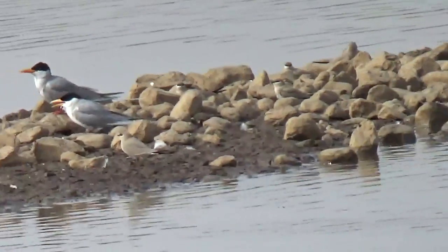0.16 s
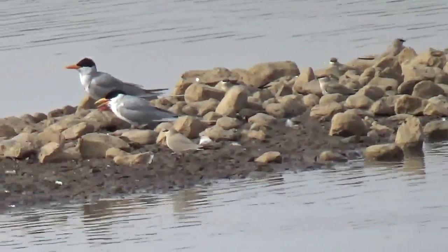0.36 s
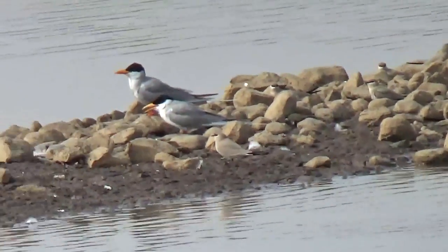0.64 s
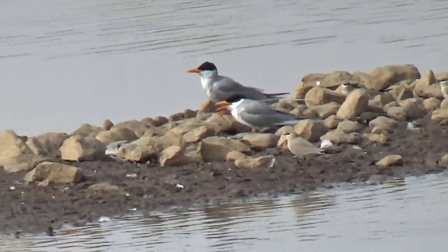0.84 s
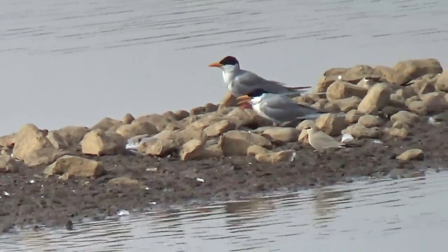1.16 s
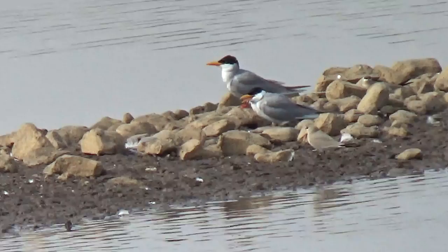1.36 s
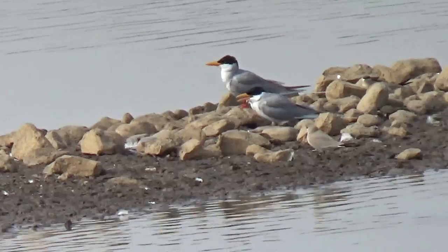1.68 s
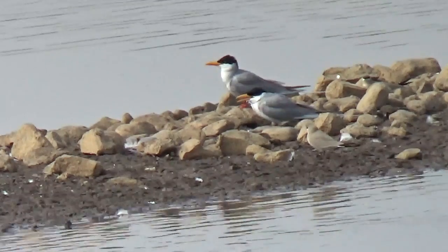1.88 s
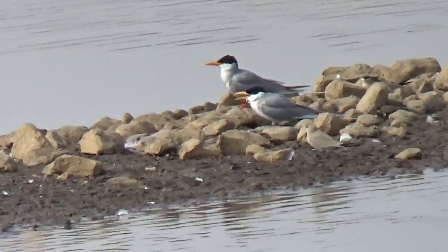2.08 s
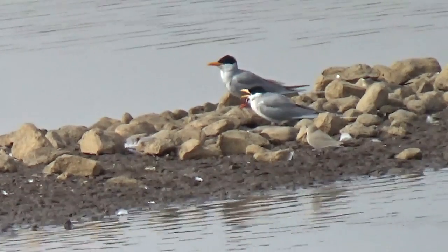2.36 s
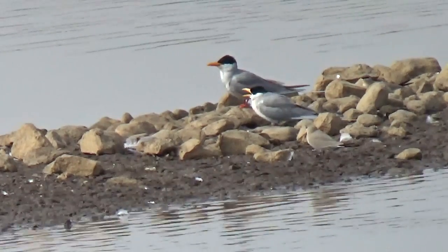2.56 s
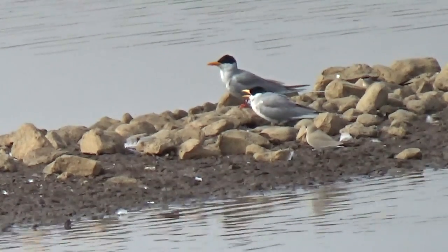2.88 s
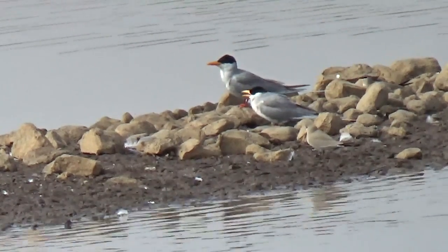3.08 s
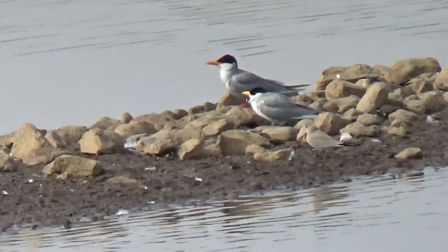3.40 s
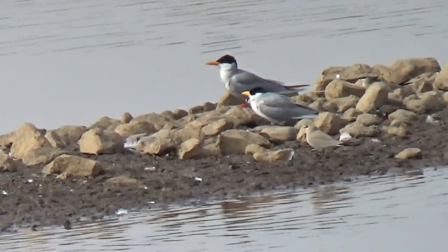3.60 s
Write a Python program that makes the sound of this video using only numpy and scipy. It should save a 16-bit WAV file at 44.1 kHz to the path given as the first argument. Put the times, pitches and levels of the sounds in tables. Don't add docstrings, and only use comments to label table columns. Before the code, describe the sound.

Tern calls run throughout: clipped, squeaky notes with rising lead-ins, strongest and brightest around 1.2-2.3 s, softer afterwards. A far wader pipes thinly until 1.1 s and faintly at 1.6. Soft wind hiss and low camera hum continue. A small plastic crack comes at 0.1 s; rubbing and sliding grow from 1.2, a loud crack and creaks hit at 2.1, then knocks near 2.5 and 2.9.

```python
import sys
import numpy as np
from scipy import signal
from scipy.fft import rfft, irfft
from scipy.io import wavfile
from scipy.ndimage import uniform_filter1d

SR = 44100
rng = np.random.default_rng(int(sys.argv[2]) if len(sys.argv) > 2 else 0)


def convert_level_to_amplitude(level_db):
    exponent = np.asarray(level_db, float) / 20
    return 10 ** exponent


def output_pcm(signal):
    pcm = np.clip(np.atleast_2d(signal).T, -1, 1) * 32767
    wavfile.write(sys.argv[1], SR, np.round(pcm).astype(np.int16))


N = 164934

# (start [s], length [s], top pitch [Hz], level [dB], beak opening [-0.5 to 1, below 0
TERN_NOTES = [(.225, 0.04, 1273, -53.5, 0), (.463, 0.044, 1277, -54, 0.45), (.597, 0.045, 1280, -53.5, 0.4),
              (.843, 0.041, 1303, -55, 0.2), (.918, 0.034, 1260, -54, 0.4), (1.179, 0.048, 1312, -51, 0.97),
              (1.437, 0.051, 1317, -48.5, 0.94), (1.828, 0.055, 1250, -49.5, 0.94),
              (1.913, 0.041, 1273, -49.5, 0.9), (2.206, .043, 1312, -51.5, 1),
              (2.287, 0.041, 1310, -56, 0.88), (2.532, 0.045, 1355, -55.5, 0.5),
              (2.612, 0.027, 1240, -61.5, -.45), (2.68, 0.036, 1302, -55, 0),
              (2.931, 0.045, 1356, -55.5, 0.2), (3.204, 0.043, 1317, -57, 0.1)]
# (start [s], length [s],
# end pitch [Hz], level [dB], beak opening [0-1])
TERN_LEADS = [(.188, 0.043, 1211, -52.5, 0.46), (.436, 0.031, 1216, -53.5, 0.34),
              (.815, 0.03, 1255, -57, 0.36), (1.151, 0.031, 1268, -51.5, 0.8),
              (1.412, 0.026, 1262, -49.5, 0.76), (1.8, 0.031, 1208, -51, 0.83), (1.89, 0.027, 1210, -54, 1),
              (2.178, 0.0278, 1294, -54, 0.95), (2.503, 0.028, 1280, -58.5, 0.3),
              (2.897, 0.025, 1260, -58, 0), (3.172, 0.039, 1285, -60, 0.2), (.951, 0.01, 1210, -52, 0)]
# (frequency [Hz], level with beak shut [dB], level with beak open [dB])
THROAT = [(1250, -11, -10), (2250, -7, -9), (2550, 0, 0), (3450, 2, -9), (3850, -9, -22), (4600, -23, -2),
          (5200, -16, 0), (6200, -17, -22)]
# (start [s], length [s], pitch [Hz], level [dB])
PIPES = [
    (0.088, 0.04, 3060, -63),
    (0.247, 0.04, 3080, -60),
    (.36, .045, 2830, -68),
    (0.418, .036, 3040, -62.5),
    (0.592, .031, 3010, -61),
    (0.756, 0.033, 3060, -60),
    (.92, .03, 3020, -67),
    (1.097, 0.03, 2980, -63),
    (1.618, .032, 2940, -66),
]
# (multiple of the shaft turn [1], level [dB], wander [dB])
MOTOR_ORDERS = [(10, -67.5, 2.4), (11, -47.5, 1.5), (12, -68, 8.8), (13, -67, 3.7), (22, -76, 3.2)]
# (time [s], level [dB])
MOTOR_LOAD = [(.15, -4.5), (.5, -1), (.75, -4), (1.9, -0.5), (2.36, 0.5), (2.56, -8), (2.75, 0),
              (3.5, -1.5), (3.74, -6)]
# (frequency [Hz], density [dB per Hz])
WIND_COLOUR = [(25, -15), (110, -2.5), (185, 8), (300, 3), (820, -11), (1900, -7.5), (5000, -20),
               (11000, -34.5)]
# (frequency [Hz], density [dB per Hz])
RUB_COLOUR = [(250, -7), (800, 7.5), (2000, 2), (4500, 0), (8000, -4), (11000, -13)]
# (time [s], level [dB])
RUB_PRESSURE = [(0, -63.5), (.65, -61.5), (1.1, -64.5), (1.2, -58.5), (1.3, -59), (1.7, -60.5), (1.82, -57),
                (2.0, -57.5), (2.12, -58.5), (2.5, -59), (2.65, -61), (3.0, -65), (3.74, -66)]
# (frequency [Hz], density [dB per Hz])
CLOTH_COLOUR = [(7200, -15), (8300, -13), (9200, -5), (11000, -4.5)]
# (time [s], level [dB])
CLOTH_SPEED = [(0, -60.5), (0.802, -61.5), (1.17, -64.5), (1.24, -52), (1.5, -49), (1.62, -54), (1.82, -53),
               (2.03, -59), (2.11, -49), (2.2, -59.5), (2.4, -58), (2.65, -62.5), (3.0, -65.5)]
# (start [s], peak [dB], rise [s])
SNAPS = [
    (0.0862, -25.5, 0.00042),
    (2.0866, -11.5, 0.00095),
]
# (frequency [Hz], level [dB], t60 [s])
SNAP_MODES = [
    [(3700, 0, 0.01), (4290, -14, 0.02), (2700, 0.5, 0.004), (4960, -4.5, 0.0031), (7770, -5.5, 0.0022),
     (10500, -7, 0.0029)],
    [(3930, 2.5, 0.0049), (3190, 8.5, 0.0025), (1700, -23, 0.0079), (10700, -20, .004), (5330, -17, 0.0048),
     (6740, -16, 0.011), (7800, -17, 0.0068), (8950, -19.5, 0.01)],
]
# (start [s], peak [dB], frequency [Hz])
TICKS = [(0.212, -46, 9700), (0.2253, -37, 11100), (0.2921, -47, 10600), (0.438, -46.5, 10100),
         (0.57, -48, 10700), (0.6155, -47, 10700), (0.7406, -47.5, 10500), (0.754, -49, 10800),
         (0.7977, -53, 10000), (1.5244, -44.5, 9700), (1.7388, -46, 10700), (1.7918, -40, 10300),
         (1.8028, -41, 9500), (1.8165, -36.5, 10500), (1.94, -44, 10100), (.4569, -51, 9250),
         (.605, -52, 9200), (2.5566, -51, 10400), (2.3588, -40.5, 10300)]
# (start [s], peak [dB], frequency [Hz])
CLICKS = [(0.1317, -61.5, 3000), (.154, -61, 4500), (0.5585, -56, 2700), (1.6165, -58.5, 2920),
          (1.6526, -55.5, 4130), (1.8147, -50.5, 4130), (2.0812, -53.5, 3320), (2.098, -54, 3200),
          (2.3588, -53.5, 3960), (1.143, -59, 3600), (.2927, -61, 5500), (.796, -63, 3170),
          (2.471, -53, 2840), (2.535, -54.5, 3360), (2.9216, -53, 2970)]
# (start [s], peak [dB], frequency [Hz])
KNOCKS = [
    (0.558, -48, 820),
    (1.815, -45, 653),
    (2.469, -40.5, 764),
    (2.535, -41.5, 1310),
    (2.921, -46, 1110),
]
# (start [s], peak [dB], frequency [Hz])
PINGS = [(.1635, -44, 4170), (.182, -49.5, 990), (.264, -55, 4200), (2.1005, -46, 1450), (2.103, -39, 3520),
         (2.1055, -46, 9450), (2.1088, -33, 9700), (2.1092, -38, 2800), (2.1125, -39, 1990),
         (2.1172, -35.5, 1840), (2.1187, -39, 2830), (2.1237, -44, 1800), (2.395, -56, 530),
         (2.425, -54, 627), (2.449, -48, 860), (2.538, -55, 1210), (2.5566, -52, 6400), (2.558, -45, 4900),
         (2.712, -50, 1200), (3.126, -50, 2350), (3.2205, -48, 587), (3.227, -55, 463)]
# (start [s], length [s], level [dB], first pitch [Hz], last pitch [Hz])
SCUFFLES = [
    (2.069, 0.041, -51, 1230, 990),
    (2.404, 0.057, -61, 800, 715),
    (2.798, 0.018, -52.5, 2980, 2550),
]


def walk(rate):
    hold = int(SR / rate)
    steps = np.repeat(rng.standard_normal(N // hold + 1), hold)
    return 1.24 * uniform_filter1d(uniform_filter1d(steps, hold), hold)[:N]


def curve(points):
    s, db = np.array(points).T
    return np.interp(np.arange(N) / SR, s, db)


def colour(x, points):
    hz, db = np.array(points).T
    gain = convert_level_to_amplitude(np.interp(np.log(np.fft.rfftfreq(N, 1 / SR) + 1), np.log(hz), db))
    y = irfft(rfft(x) * gain, N)
    return y / y.std()


def add(out, start, x):
    i = int(start * SR)
    out[i:i + len(x)] += x[:N - i]


def swell(t, length, attack, release):
    ramp = np.minimum(t / attack, (length - t) / release)
    return np.sin(np.pi / 2 * np.clip(ramp, 0, 1)) ** 2


def ring(hz, db, t60, rise=0.00006):
    t = np.arange(int(.06 * SR)) / SR
    return convert_level_to_amplitude(db - 60 * t / t60) * np.sin(2 * np.pi * hz * t) * np.minimum(t / rise, 1) ** 2


def taps(rows, cycles, spread, gain_db):
    out = np.zeros(N)
    for start, db, hz in rows:
        steps = np.arange(5) - 2 + 0.5 * (rng.random(5) - .5)
        for k, step in enumerate(steps):
            mode = ring(hz * (1 + spread) ** step, db + gain_db - 2.7 * abs(step), cycles / hz)
            add(out, start, mode * (-1) ** k)
    return out


def motor():
    shaft_hz = 16.585
    t = np.arange(N) / SR
    hum = np.zeros(N)
    for order, db, wander_db in MOTOR_ORDERS:
        level = convert_level_to_amplitude(db + wander_db * walk(8))
        drift = 0.22 * wander_db * walk(5.25)
        hum += level * np.sin(2 * np.pi * round(order) * shaft_hz * t + drift)
    return hum * convert_level_to_amplitude(curve(MOTOR_LOAD))


def wind():
    return colour(rng.standard_normal(N), WIND_COLOUR) * convert_level_to_amplitude(-62 + 0.53 * walk(5.0))


def friction(spectrum, effort):
    grains_per_s, scatter_db, grain_share, flicker_db = 1200, 2.8, .5, 1.4
    hits = rng.random(N) < grains_per_s / SR
    sizes = convert_level_to_amplitude(scatter_db * np.minimum(rng.exponential(size=N), 4))
    grains = hits * sizes * rng.standard_normal(N)
    rough = grain_share * grains / grains.std() + rng.standard_normal(N)
    return colour(rough, spectrum) * convert_level_to_amplitude(curve(effort) + flicker_db * walk(25.49))


def hiss(cloth_db):
    fingers = friction(RUB_COLOUR, RUB_PRESSURE)
    cloth = friction(CLOTH_COLOUR, CLOTH_SPEED)
    return wind() + fingers + convert_level_to_amplitude(cloth_db) * cloth


def snaps():
    out = np.zeros(N)
    for (start, db, rise), modes in zip(SNAPS, SNAP_MODES):
        for hz, mode_db, t60 in modes:
            add(out, start, ring(hz, db + mode_db, t60, rise))
    return out


def wader():
    sag, waver_share, flutter_db = .012, .008, 2.5
    out, waver, flutter = np.zeros(N), walk(200), walk(150)
    for start, length, hz, db in PIPES:
        t = np.arange(int(length * SR)) / SR
        span = slice(int(start * SR), int(start * SR) + len(t))
        pitch = hz * (1 + sag * (.5 - t / length) + waver_share * waver[span])
        level = convert_level_to_amplitude(db + flutter_db * flutter[span]) * swell(t, length, .005, .008)
        add(out, start, level * np.sin(2 * np.pi * np.cumsum(pitch) / SR))
    return out


def hand():
    clicks = taps(CLICKS, cycles=20, spread=.3, gain_db=12.0)
    pings = taps(PINGS, cycles=22, spread=.055, gain_db=7.5)
    ticks = taps(TICKS, cycles=45, spread=.06, gain_db=5.0)
    knocks = taps(KNOCKS, cycles=21.6, spread=0.293, gain_db=-2.5)
    return clicks + pings + ticks + knocks


def lead_pitch(t, length, end_hz):
    rise_hz_per_s = 3000
    return end_hz - rise_hz_per_s * (length - t)


def note_pitch(u, top_hz):
    top_at, rise, sag, sag_power = 0.33, 0.04, 0.165, 2.4
    climb = rise * np.clip(1 - u / top_at, 0, 1) ** 2
    fall = sag * (np.clip(u - top_at, 0, 2) / (1 - top_at)) ** sag_power
    return top_hz * (1 - climb - fall)


def beak_closing(u, beak):
    close_at, share = .6, 1.6
    return share * max(beak * (1.15 - beak), 0) * np.clip((u - close_at) / (1 - close_at), 0, 1)


def terns():
    edge_s, waver_share, flutter_db = .005, .005, 1.4
    out, waver = np.zeros(N), walk(300)
    flutter = np.array([walk(160) for _ in range(6)])
    throat_hz, shut_db, open_db = np.array(THROAT).T
    k = np.arange(1, 7)[:, None]
    for rows, is_lead in ((TERN_NOTES, False), (TERN_LEADS, True)):
        for start, length, hz, db, beak in rows:
            t = np.arange(int((length + (-.002 if is_lead else .002)) * SR)) / SR
            u = t / length
            span = slice(int(start * SR), int(start * SR) + len(t))
            pitch = lead_pitch(t, length, hz) if is_lead else note_pitch(u, hz)
            pitch = pitch * (1 + waver_share * waver[span])
            opening = np.clip(beak, -.5, 1) - (0 if is_lead else beak_closing(u, beak))
            throat_db = np.interp(k * pitch, throat_hz, shut_db)
            throat_db = throat_db + opening * np.interp(k * pitch, throat_hz, open_db - shut_db)
            gain = convert_level_to_amplitude(throat_db + flutter_db * np.sqrt(k) * flutter[:, span])
            phase = 2 * np.pi * np.cumsum(pitch) / SR
            voice = (gain * np.sin(k * (phase + k))).sum(axis=0)
            add(out, start - edge_s / 2, voice * swell(t, t[-1], edge_s, edge_s) * convert_level_to_amplitude(db))
    return out


def scuffles():
    taps_per_s = 700
    rows = []
    for start, length, db, first_hz, last_hz in SCUFFLES:
        for u, size, tone in rng.random((int(length * taps_per_s), 3)):
            hz = first_hz + u * (last_hz - first_hz)
            rows.append((start + u * length, db + 5 * (2 * size - 1), hz * 1.38 ** (2 * tone - 1)))
    return taps(rows, cycles=8.7, spread=0.22, gain_db=5.5)


def scene():
    side_db, cloth_side_db, treble_left_db, middle_right_db = -10.5, -3, 1.4, 1.0
    mid = motor() + hiss(0) + snaps() + wader() + hand() + terns() + scuffles()
    apart = signal.lfilter(*signal.butter(1, 600, "high", fs=SR), hiss(cloth_side_db))
    treble = signal.lfilter(*signal.butter(2, 7000, "high", fs=SR), mid)
    middle = signal.lfilter(*signal.butter(2, (400, 2200), "band", fs=SR), mid)
    lean = (convert_level_to_amplitude(treble_left_db / 2) - 1) * treble - (convert_level_to_amplitude(middle_right_db / 2) - 1) * middle
    side = convert_level_to_amplitude(side_db) * apart + lean
    return np.array([mid + side, mid - side])


def low_pass(x):
    return signal.sosfilt(signal.butter(12, 12370, fs=SR, output="sos"), x)


def record(dry):
    cut = signal.ellip(9, .2, 40, 11030, fs=SR, output="sos")
    return low_pass(signal.sosfilt(cut, dry))


dry = scene()
out = record(dry)
output_pcm(out)
```